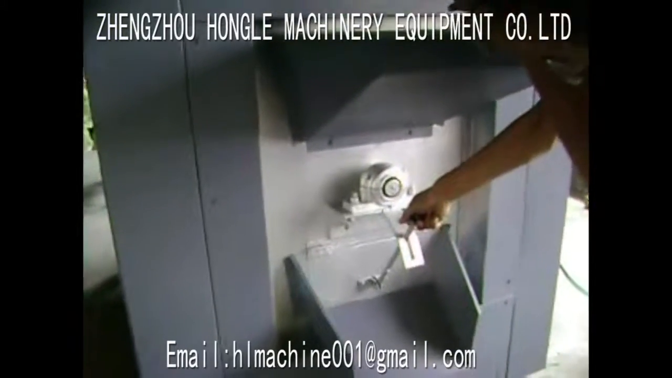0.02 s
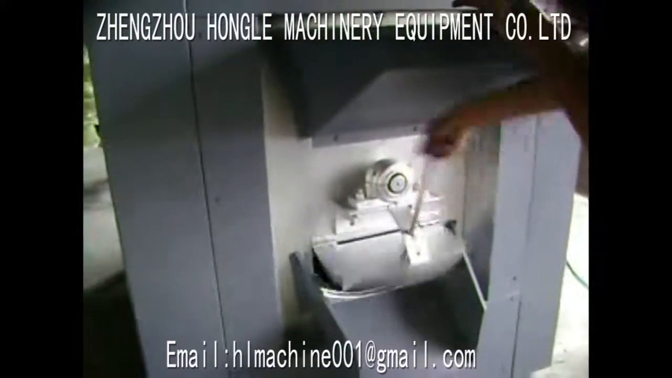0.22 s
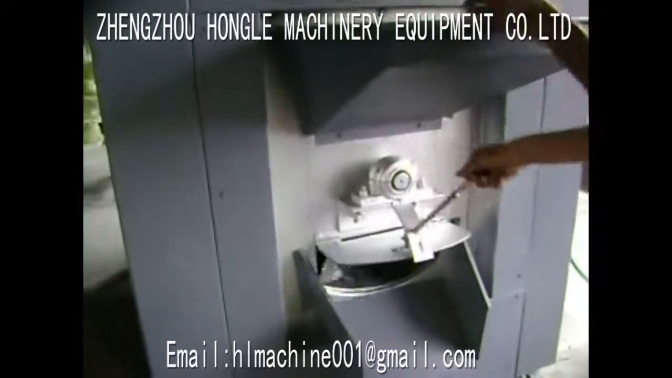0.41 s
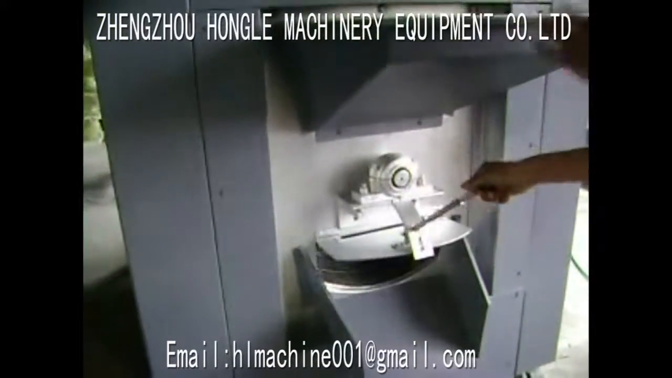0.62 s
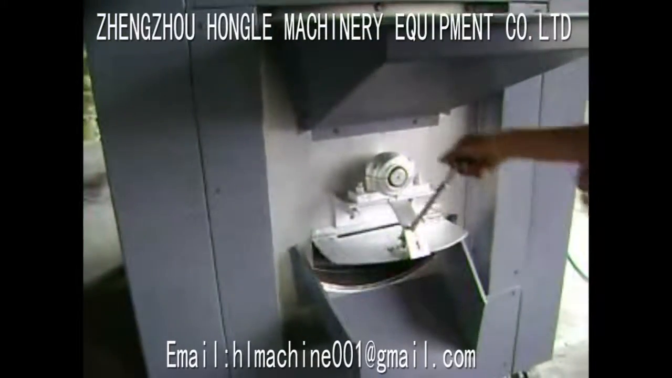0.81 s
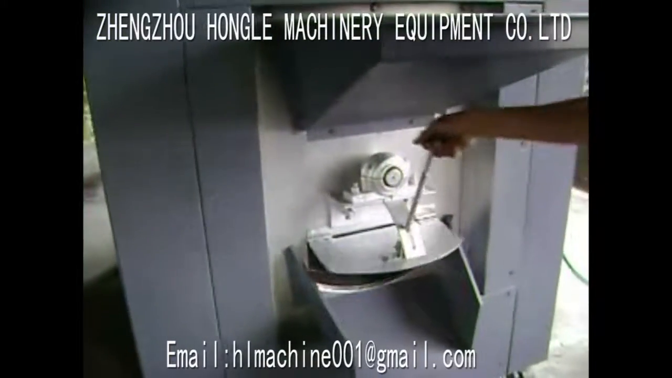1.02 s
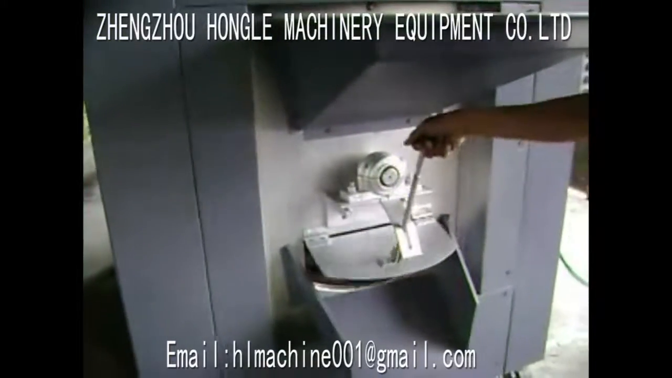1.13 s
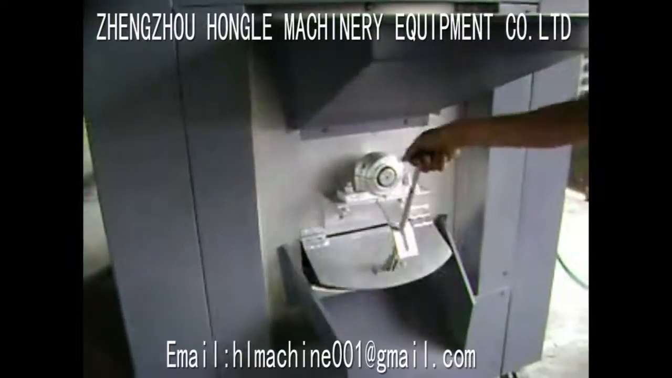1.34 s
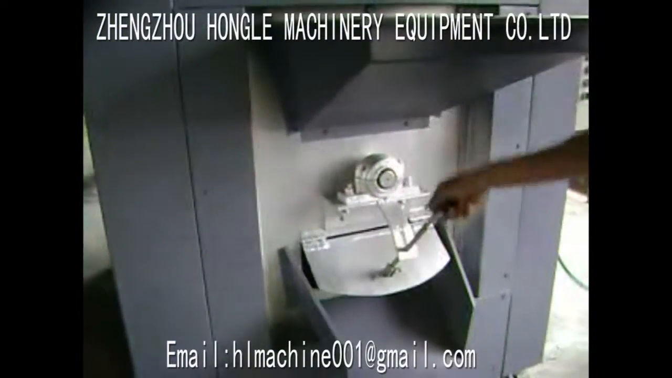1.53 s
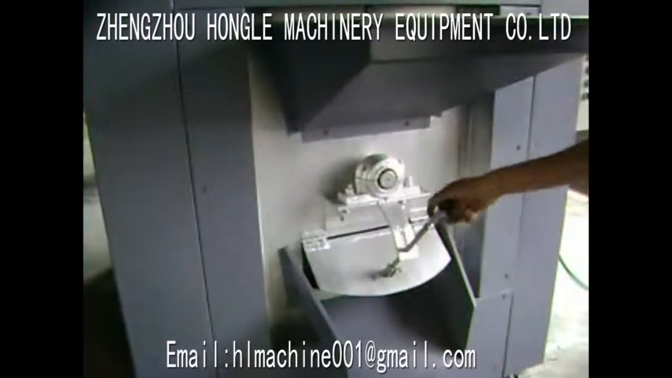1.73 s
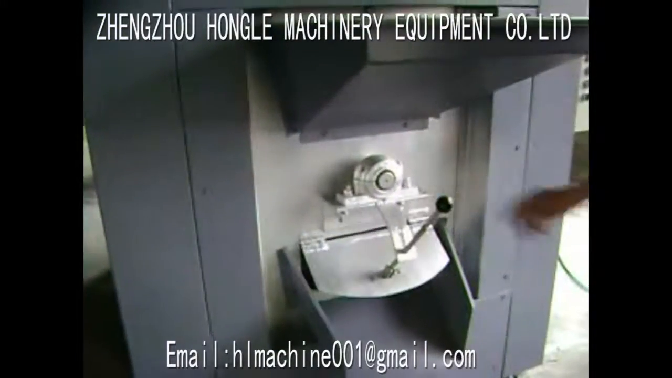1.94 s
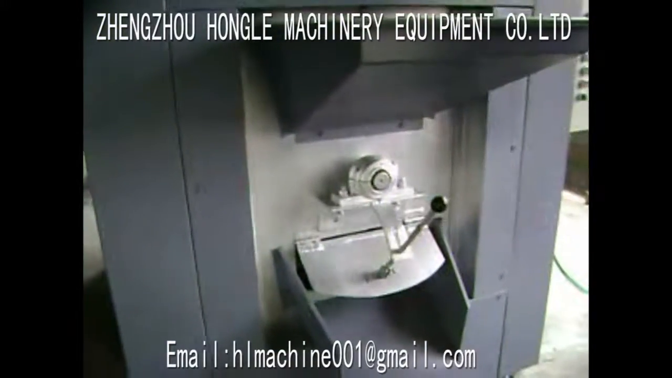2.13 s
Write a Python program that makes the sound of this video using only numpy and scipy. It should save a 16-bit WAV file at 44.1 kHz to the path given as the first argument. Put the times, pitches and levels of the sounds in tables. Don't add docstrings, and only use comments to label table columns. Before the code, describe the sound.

A hand-levered steel door bangs open with a rattle, then rubs closed and clanks twice beside a running machine

```python
import sys
import numpy as np
from scipy import signal
from scipy.fft import rfft, irfft
from scipy.io import wavfile
from scipy.ndimage import uniform_filter1d

SR = 44100
rng = np.random.default_rng(int(sys.argv[2]) if len(sys.argv) > 2 else 0)


def dump(signal):
    limited = np.clip(np.atleast_2d(signal).T, -1, 1)
    pcm = np.round(limited * 32767).astype(np.int16)
    wavfile.write(sys.argv[1], SR, pcm)


def elevation(decibels):
    levels = np.asarray(decibels, float)
    return 10 ** (levels / 20)


N = 97020

# time [s], roar level [dB], rub level [dB], bass change [dB].
DOOR_MOTION = [(0, -5, -33, 4), (.2, -1.5, -50, 0), (.5, -3.5, -58, 7), (.98, 0, -36.5, 2),
               (1.08, 1, -22.5, -6.5), (1.24, -2.5, -18.5, -13), (1.3, -3, -18.5, -14.5),
               (1.42, 3, -27.5, 3.5), (1.6, -0.5, -21.5, 0.5), (1.85, -1, -25, -2.5), (2.2, -3, -32, 0.5)]
# frequency [Hz], level [dB], t60 [s].
PANEL_MODES = [(135, -8, .2), (258, -8, .2), (366, -7, .18), (535, -1, .22), (632, -2, .17), (727, -4, .14),
               (800, -1, .2), (910, -6, .1), (1075, -2, .12), (1165, -2, .08), (1240, 0, .22),
               (1900, -7, .08), (190, -8, .2), (2330, -6, .08)]
# frequency [Hz], level [dB].
CRACK_COLOUR = [(40, -27), (150, -21), (312, -9), (700, -3.5), (1600, -14.5), (2390, -8), (4000, -17.5),
                (5500, -19.5)]


def read(points, hz):
    f, value = np.transpose(points)
    return np.interp(np.log(hz + 1), np.log(f + 1), value)


def curve(table, column):
    rows = np.transpose(table)
    return np.interp(np.arange(N) / SR, rows[0], rows[column])


def span(table):
    i = np.arange(N)
    return (i > table[0][0] * SR) & (i < table[-1][0] * SR)


def evened(x):
    return x / np.sqrt(np.mean(x ** 2) + 1e-20)


def coloured(x, points):
    hz = np.fft.rfftfreq(len(x), 1 / SR)
    return irfft(rfft(x) * elevation(read(points, hz)), len(x))


def resonate(x, hz, width):
    r = np.exp(-np.pi * width / SR)
    return 2 * signal.lfilter([1 - r], [1, -r * np.exp(2j * np.pi * hz / SR)], x).real


def drift(rate_hz):
    size = int(SR / rate_hz)
    x = uniform_filter1d(uniform_filter1d(rng.standard_normal(N), size), size)
    return evened(x - uniform_filter1d(x, size=6 * size))


def add(mix, s, sound):
    part = mix[round(s * SR):][:len(sound)]
    part += sound[:len(part)]


def workshop(x):
    # frequency [Hz], t60 [s].
    room_decay = [(100, 0.97), (1000, 0.35), (5000, 0.27)]
    hz, t, z = signal.stft(rng.standard_normal(SR), SR, nperseg=256)
    decay_db = -60 * t / read(room_decay, hz)[:, None]
    tail = signal.istft(z * elevation(decay_db), SR, nperseg=256)[1][:SR]
    tail = tail * np.clip(np.arange(SR) / SR / 0.005 - .5, 0, 1)
    return signal.fftconvolve(x, tail / np.linalg.norm(tail))[:N]


def roar():
    # frequency [Hz], density [dB per Hz].
    roar_colour = [(25, -8.5), (80, -10), (200, -6), (420, -19), (600, -8), (1660, -11.5), (2340, -11.5),
                   (5500, -16)]
    # frequency [Hz], width [Hz], level [dB].
    casing_modes = [(241.6, 16, -15.5), (354.6, 15, -13), (531, 19, -12), (681, 21, -38.5), (704, 20, -8.5),
                    (894, 120, -10.5), (1170, 72, -11.5), (2335, 470, -4)]
    body = np.zeros(N)
    for hz, width, db in casing_modes:
        body += elevation(db) * evened(resonate(rng.standard_normal(N), hz, width))
    both = body + evened(coloured(rng.standard_normal(N), roar_colour))
    bass = signal.sosfiltfilt(signal.butter(2, 330, fs=SR, output="sos"), both)
    bass_change = elevation(curve(DOOR_MOTION, 3)) - 1
    level_db = -23.5 + curve(DOOR_MOTION, 1) + .9 * drift(40)
    return elevation(level_db) * (both + bass_change * bass)


def gears():
    # time [s], 16th order [dB], 17th order [dB], 5th order [dB].
    whine = [(0, -35, -48, -51), (.15, -32.5, -33, -34.5), (.55, -33.5, -47.5, -33), (.85, -36, -29, -35.5),
             (1.0, -28.5, -28, -38.5), (1.25, -37, -28, -42.5), (1.6, -39.5, -32.5, -33.5),
             (1.85, -39, -31, -37), (2.2, -37.5, -43, -48)]
    gear_hz = 133.85
    turns = np.cumsum(gear_hz * (1 + .0006 * drift(8))) / SR
    out = np.zeros(N)
    for column, order in enumerate((16, 17, 5), start=1):
        level = np.sqrt(2) * elevation(curve(whine, column) + 0.5 * drift(23))
        out += level * np.sin(2 * np.pi * (order * turns + rng.random()))
    return out


def scrape(ticks_per_s, blur, bright):
    hits = rng.random(N) < ticks_per_s / SR
    ticks = rng.standard_normal(N) * hits * elevation(0.7 * drift(40))
    modes = np.zeros(N)
    for hz, db, t60 in PANEL_MODES:
        modes += elevation(db) * evened(resonate(ticks, hz, blur / t60))
    return evened(modes) + bright * evened(coloured(ticks, CRACK_COLOUR))


def rub():
    # time [s], pitch [Hz], level [dB].
    buzz_path = [(1.04, 132, -50), (1.08, 131, -29), (1.2, 130, -24), (1.26, 130, -23), (1.3, 129, -33),
                 (1.36, 132, -31), (1.4, 134, -25), (1.44, 135, -45)]
    buzz_orders = [-1, -3, -7.5, -18, -15.5, -14.5, -12, -19.5, -4.5, -15.5]
    turns = np.cumsum(curve(buzz_path, 1) * (1 + 0.013 * drift(36.6))) / SR
    buzz = np.zeros(N)
    for order, db in enumerate(buzz_orders, start=1):
        buzz += elevation(db + 2 * drift(31)) * np.sin(2 * np.pi * (order * turns + rng.random()))
    scraping = elevation(curve(DOOR_MOTION, 2)) * scrape(9000, 8.3, 0.21)
    return scraping + span(buzz_path) * elevation(curve(buzz_path, 2)) * buzz


def rattle():
    # time [s], level [dB].
    rattle_path = [(.228, -13.5), (.25, -14.5), (.28, -12), (.3, -13), (.32, -8), (.36, -15), (.42, -21),
                   (.5, -28), (.65, -31.5)]
    return span(rattle_path) * elevation(curve(rattle_path, 1)) * scrape(12000, 6, 1.34)


def judder():
    # time [s], pitch [Hz], level [dB].
    song_path = [(.26, 730, -18), (.285, 730, -10), (.294, 725, 0), (.312, 740, -4), (.335, 728, 3),
                 (.37, 730, 0), (.396, 728, -2), (.401, 730, -17), (.45, 730, -30)]
    turns = np.cumsum(curve(song_path, 1) * (1 + .016 * drift(70))) / SR
    level = elevation(curve(song_path, 2) + 2.5 * drift(85))
    return span(song_path) * level * np.sin(2 * np.pi * turns)


def ring(modes, lift_db, rise_s):
    t, (hz, db, t60) = np.arange(SR // 4)[:, None] / SR, np.transpose(modes)
    phase, b, c = rng.random((3, len(hz)))
    slow = np.cos(2 * np.pi * (20 + 25 * b) * t)
    fast = np.cos(2 * np.pi * (45 + 40 * c) * t)
    flutter_db = 1.5 * (slow + fast - 1)
    level = elevation(db + lift_db + flutter_db - 60 * t / t60)
    tones = level * np.sin(2 * np.pi * (hz * t + phase))
    return tones.sum(1) * np.minimum(t[:, 0] / rise_s, 1)


def knocks():
    # time [s], ring level [dB], centre of colour [Hz], crack level [dB].
    door_hits = [(.228, -1.5, 560, -4.5), (.23, -4.5, 750, -14), (.237, -8.5, 1080, -26),
                 (.245, -9.5, 624, -15), (.25, -8, 366, -11.5), (.314, -1, 535, -3), (.43, -7, 136, -26),
                 (1.44, -27, 1120, -17.5), (1.444, 0.5, 2000, -8), (1.445, -12.5, 540, -12.5),
                 (1.46, -7.5, 178, -10), (1.471, -13, 1113, -9.5), (1.486, -12.5, 1000, -9.5),
                 (.405, -4, 535, -13), (.436, -7, 540, -22), (.47, -11, 540, -26), (1.443, -2, 1120, -10),
                  (1.45, -5, 800, -16), (1.452, -4, 1240, -18), (1.532, -11, 620, -22),
                  (1.56, -16, 1240, -28), (1.647, -6, 1170, -15), (1.65, -12, 910, -22),
                  (1.655, -7, 635, -22), (1.665, -16, 1240, -24)]
    # frequency [Hz], level [dB], t60 [s].
    latch_modes = [(2107, 0, 0.058), (2800, -7, 0.064), (4100, -6.5, 0.042), (5300, -17.5, .06)]
    # time [s], level [dB].
    latch_clinks = [
        (.313, 5),
        (1.482, 5.5),
        (1.66, -3.5),
    ]
    colour_octaves, crack_t60_s = .16, .08
    out, t = np.zeros(N), np.arange(SR // 4) / SR
    panel_hz = np.transpose(PANEL_MODES)[0]
    for s, ring_db, centre_hz, crack_db in door_hits:
        octaves_off = np.log2(panel_hz / centre_hz)
        lift_db = ring_db - 6 * (octaves_off / colour_octaves) ** 2
        add(out, s, ring(PANEL_MODES, lift_db, .002))
        crack = evened(coloured(rng.standard_normal(len(t)), CRACK_COLOUR))
        fall = elevation(crack_db - 60 * t / crack_t60_s)
        add(out, s, crack * fall * np.minimum(t / 0.00068, 1))
    for s, db in latch_clinks:
        add(out, s, ring(latch_modes, db - 3, .004))
    return out


def scene():
    door = knocks() + rattle()
    song = judder()
    wet = elevation(-11) * workshop(door + elevation(-4) * song)
    return (door + song + wet + roar() + gears() + rub())[None]


def top_cut(x):
    return signal.sosfilt(signal.butter(12, 16000, fs=SR, output="sos"), x)


def record(dry):
    edge_hz, fall_db, overload, top_hz = 5000, 11, 1.0, 14900
    hz = np.fft.rfftfreq(N, 1 / SR)
    loss_db = np.minimum(fall_db * (np.maximum(hz - edge_hz, 0) / 1000) ** 2, 200)
    dull = irfft(rfft(dry) * elevation(-loss_db), N)
    clipped = np.clip(dull, -overload, overload)
    limited = irfft(rfft(clipped) * np.clip((top_hz - hz) / 600 + 1, 0, 1), N)
    return top_cut(limited)


dry = scene()
out = record(dry)
dump(out)
```